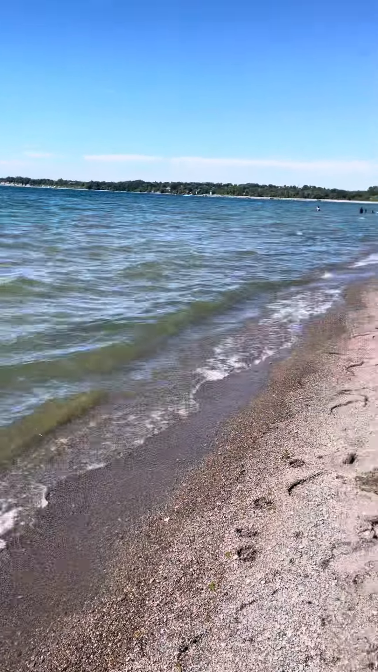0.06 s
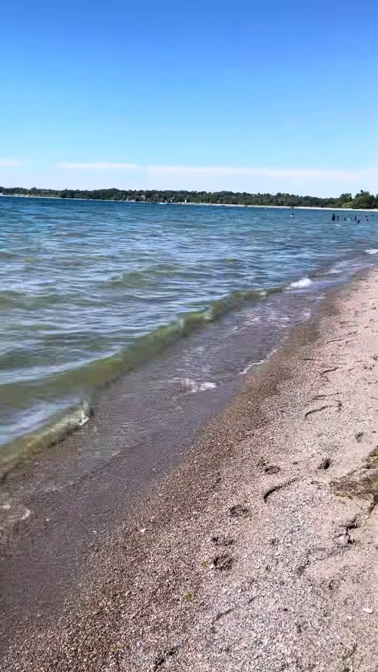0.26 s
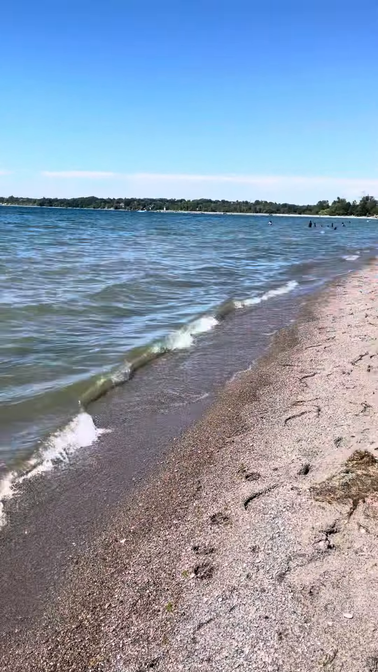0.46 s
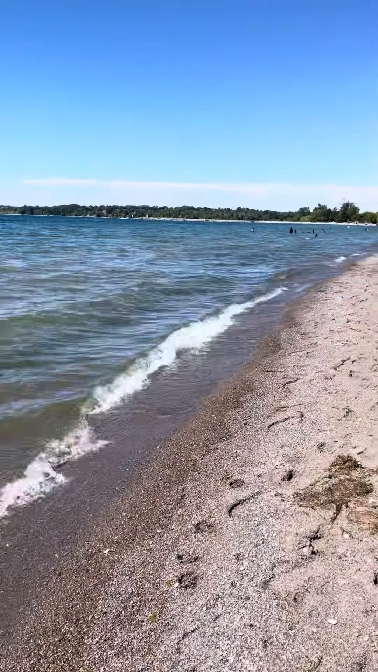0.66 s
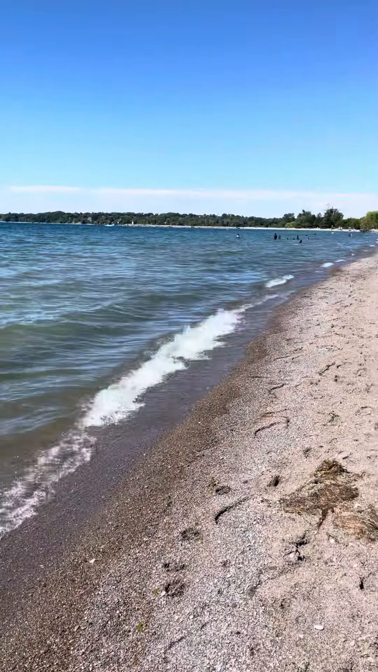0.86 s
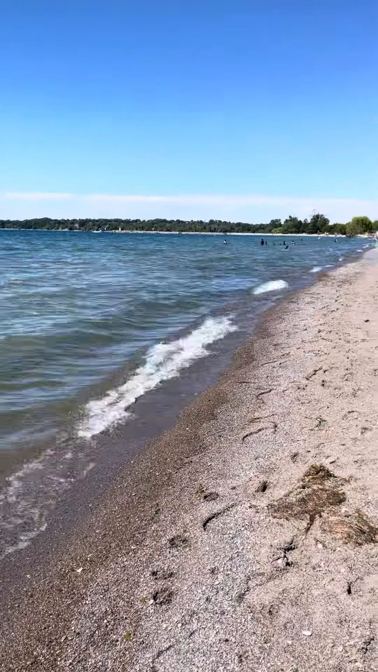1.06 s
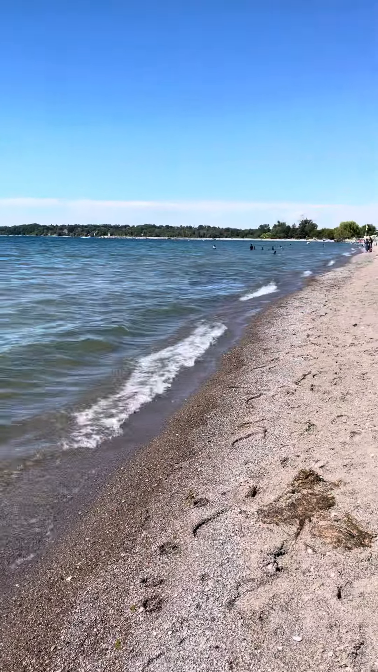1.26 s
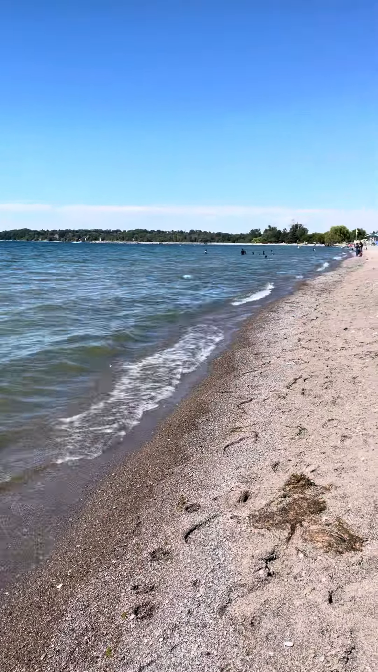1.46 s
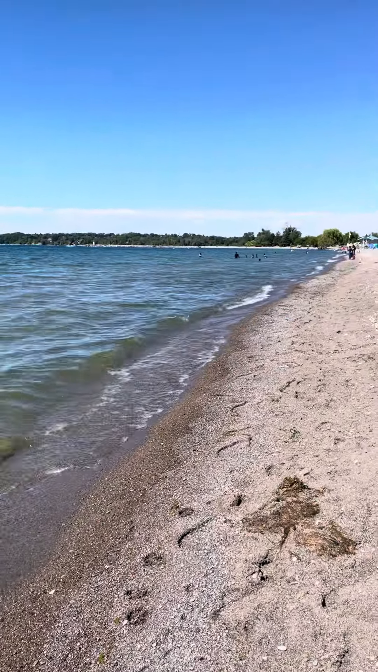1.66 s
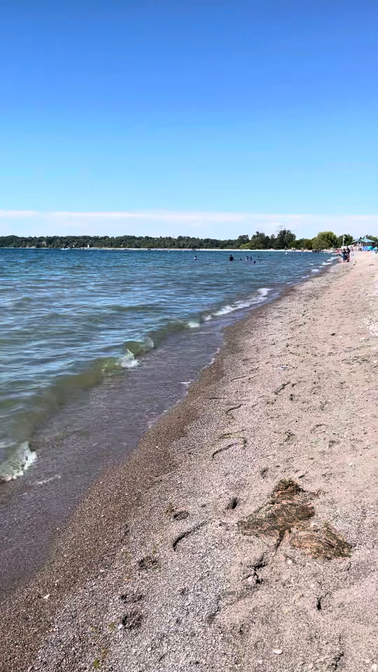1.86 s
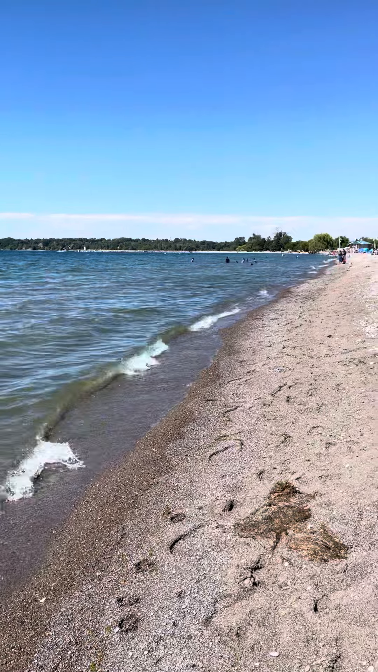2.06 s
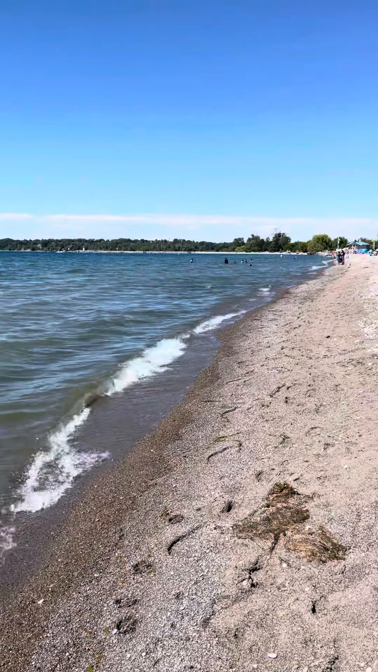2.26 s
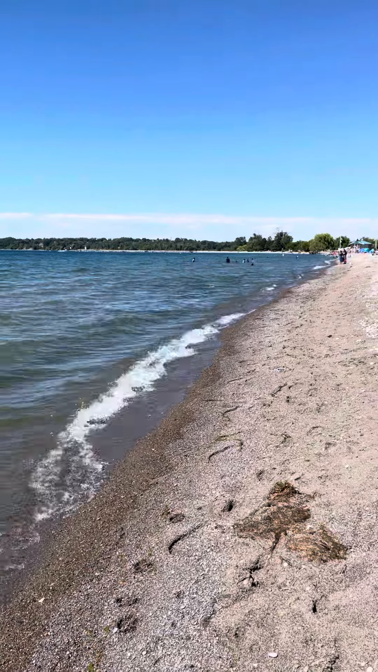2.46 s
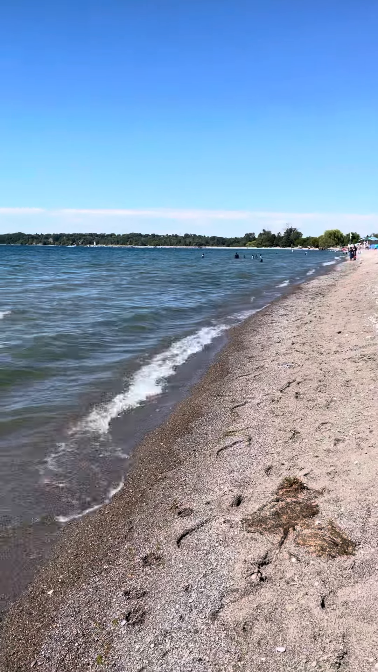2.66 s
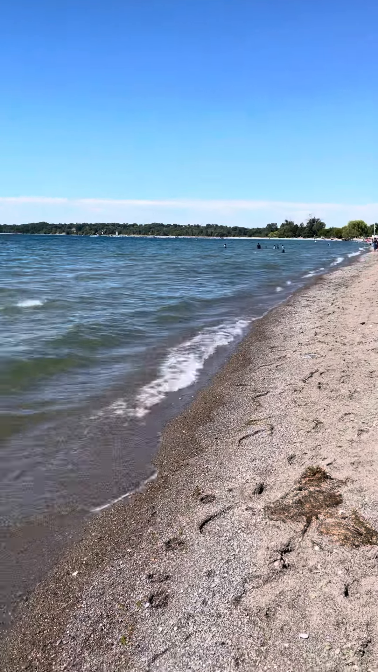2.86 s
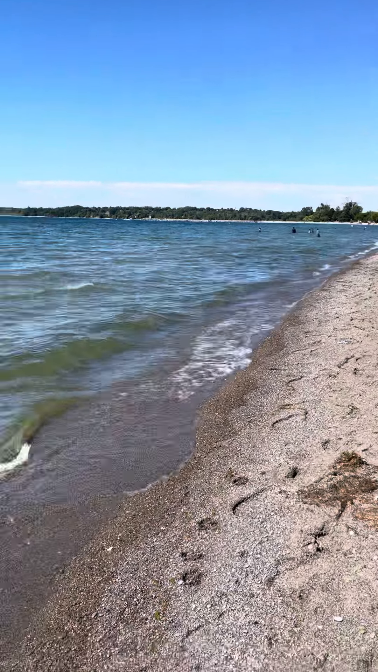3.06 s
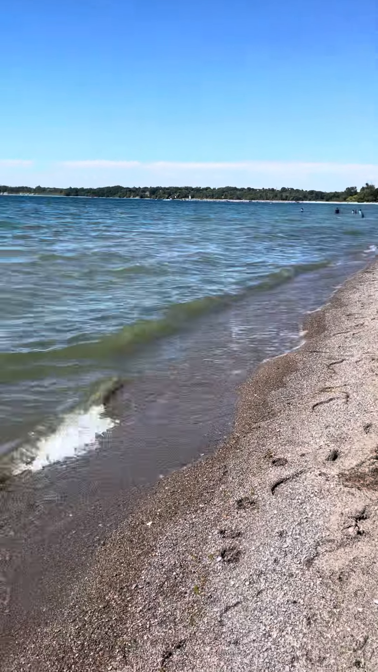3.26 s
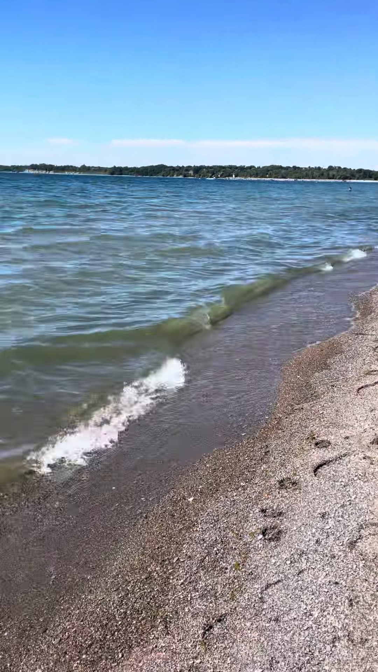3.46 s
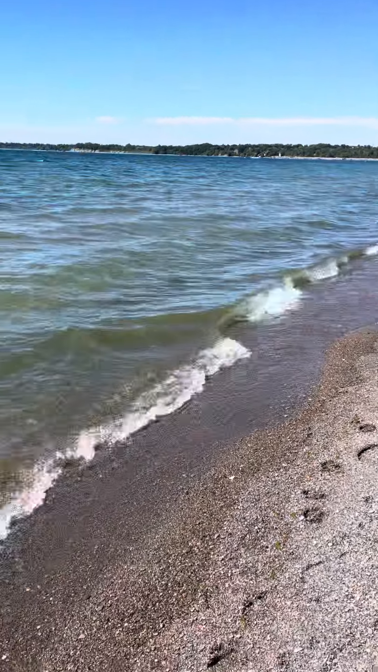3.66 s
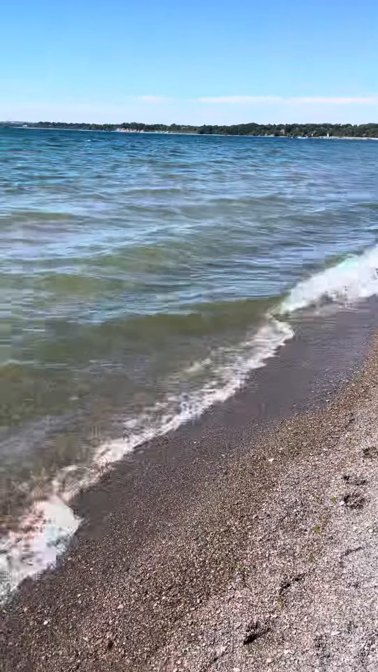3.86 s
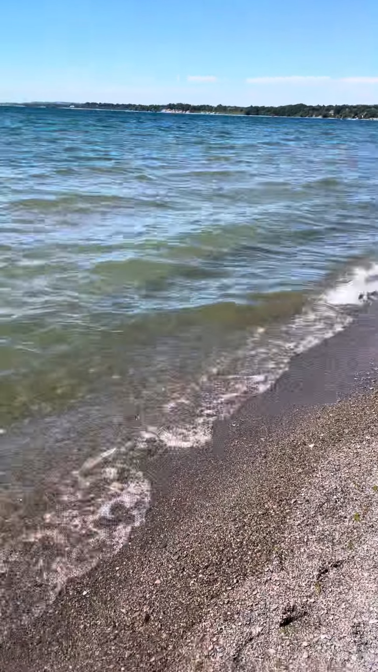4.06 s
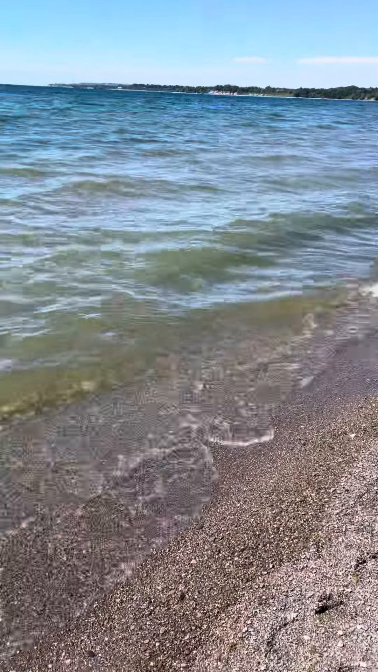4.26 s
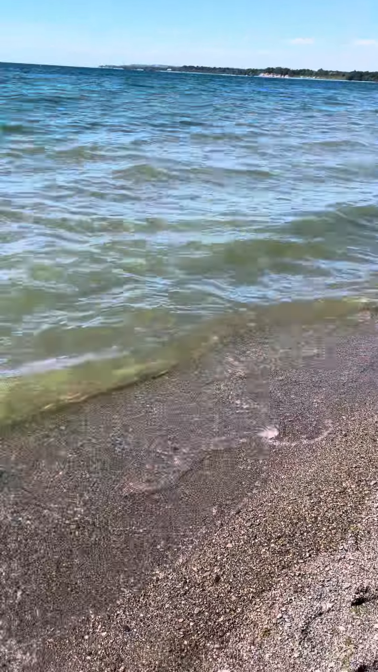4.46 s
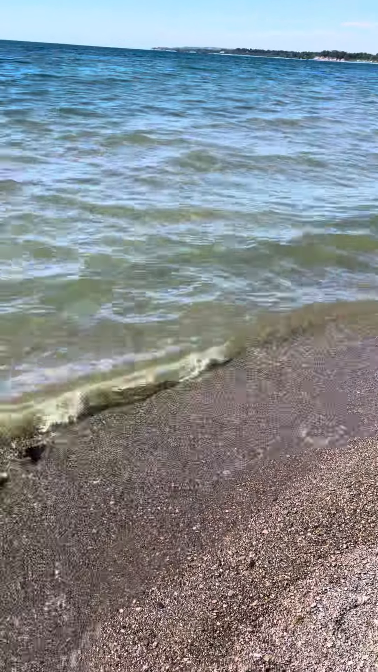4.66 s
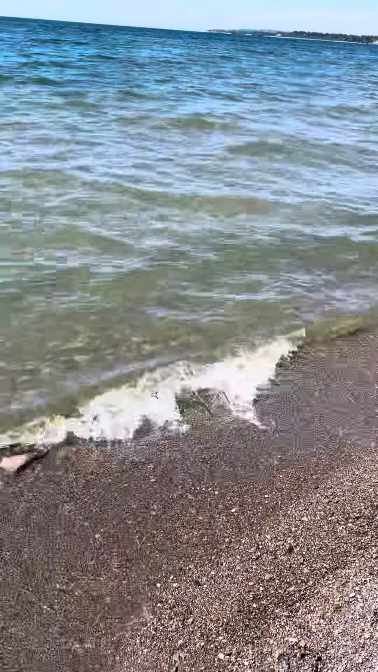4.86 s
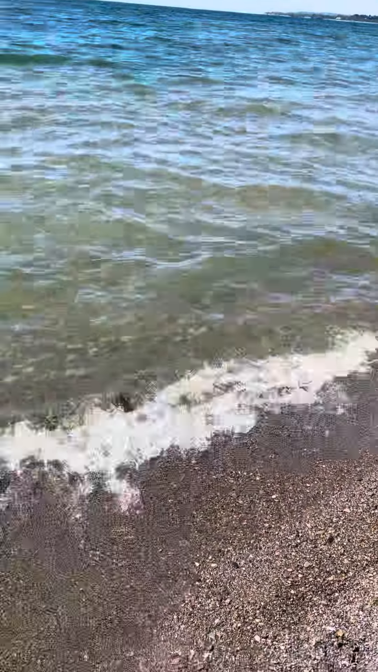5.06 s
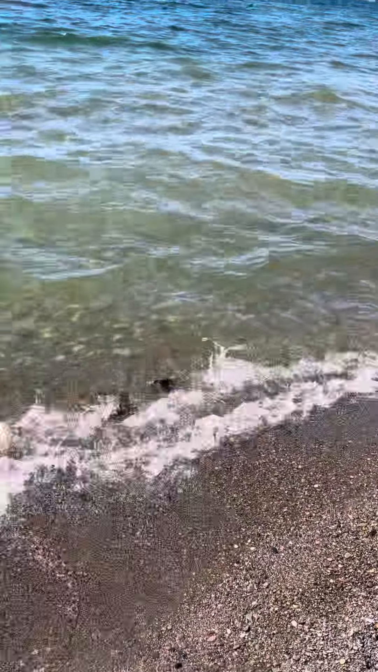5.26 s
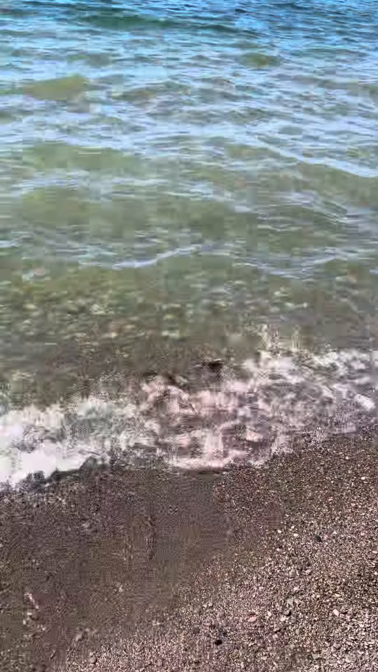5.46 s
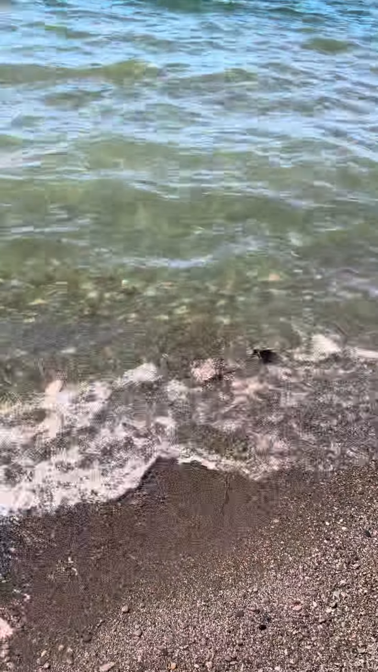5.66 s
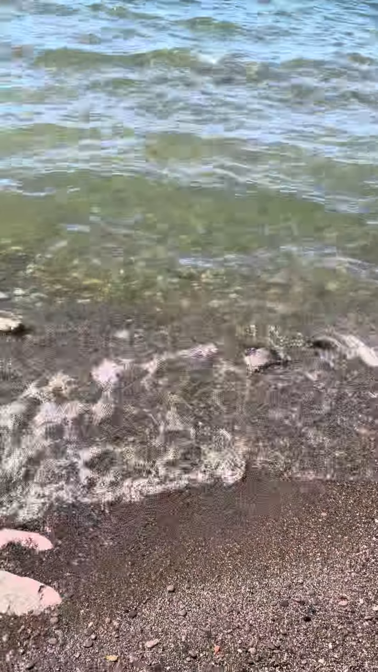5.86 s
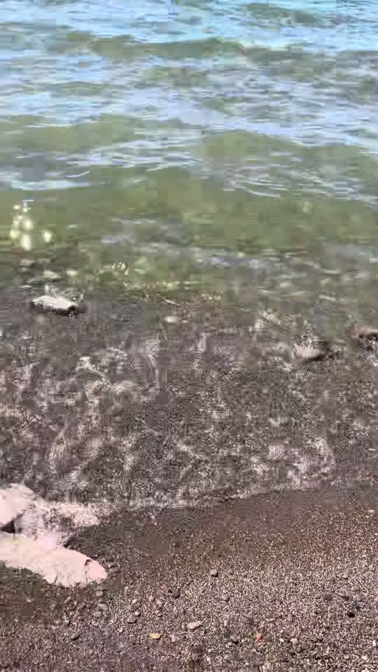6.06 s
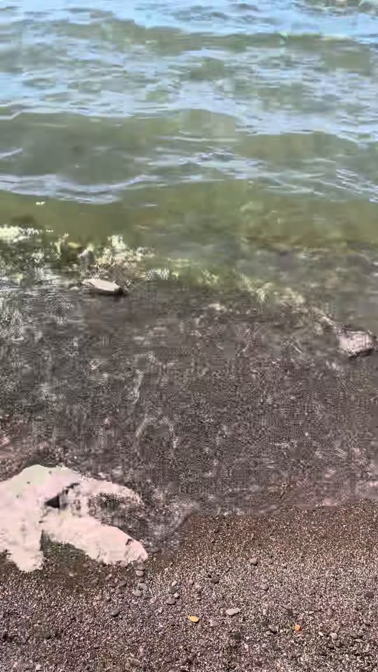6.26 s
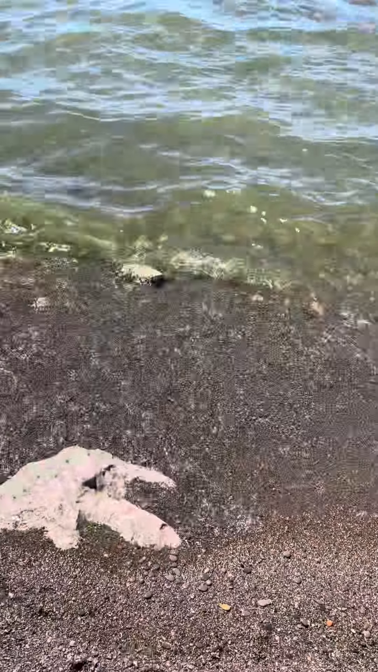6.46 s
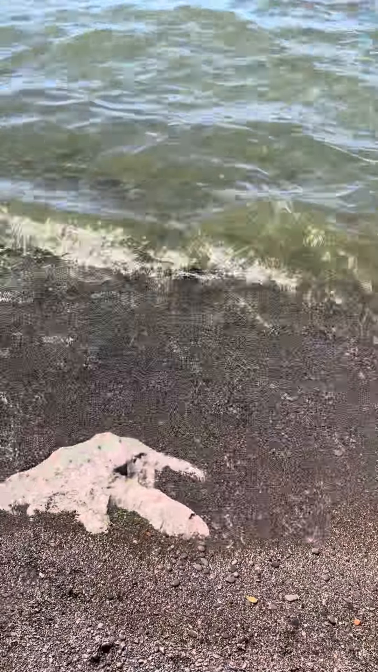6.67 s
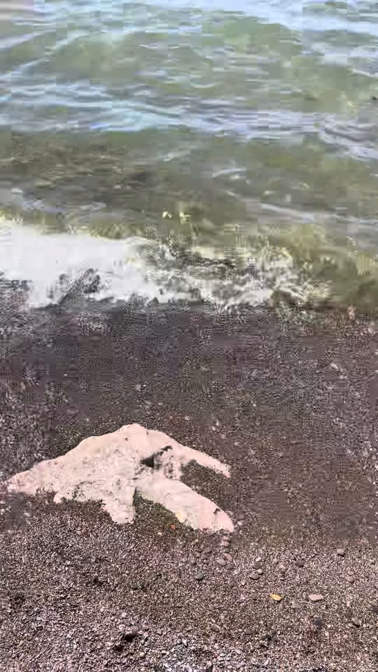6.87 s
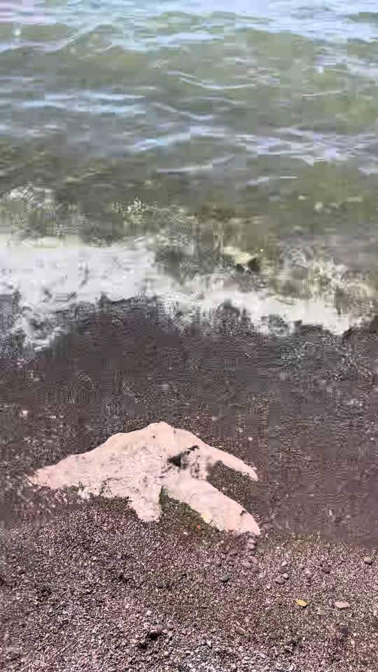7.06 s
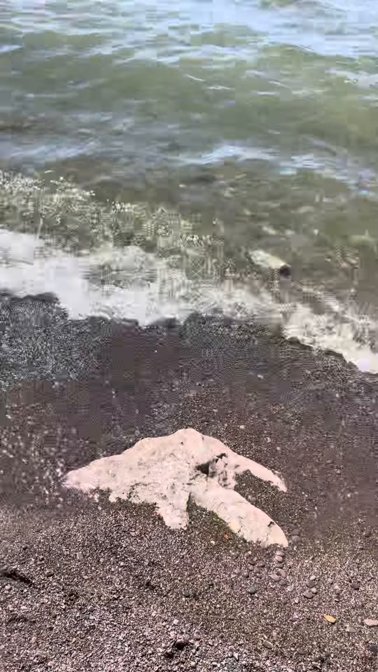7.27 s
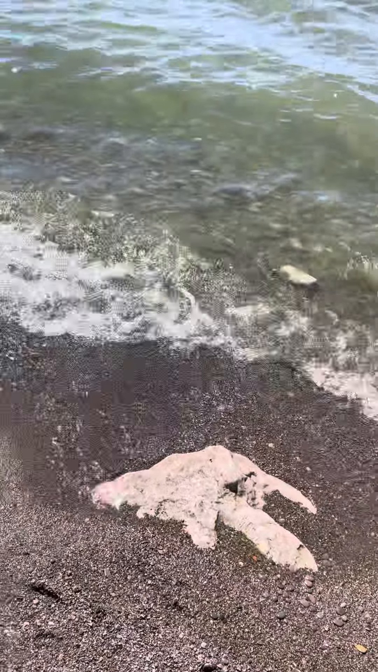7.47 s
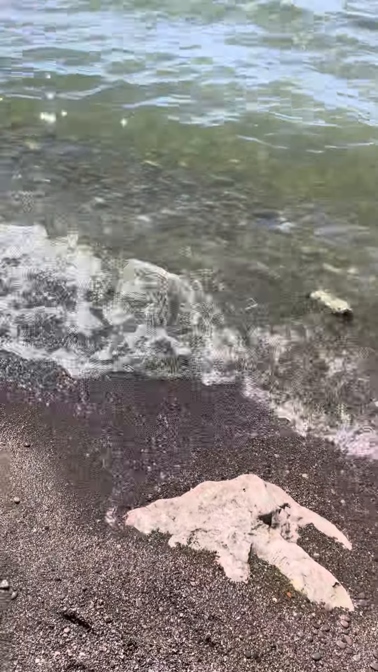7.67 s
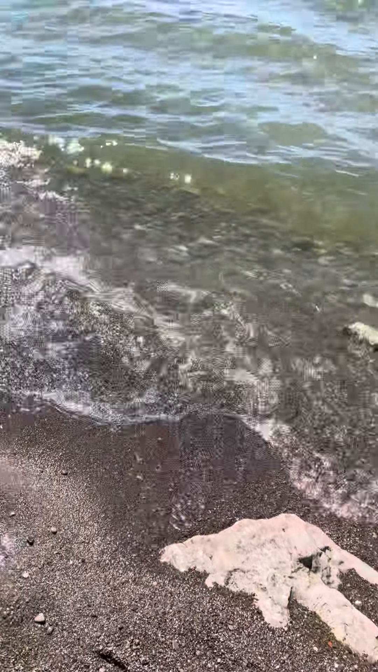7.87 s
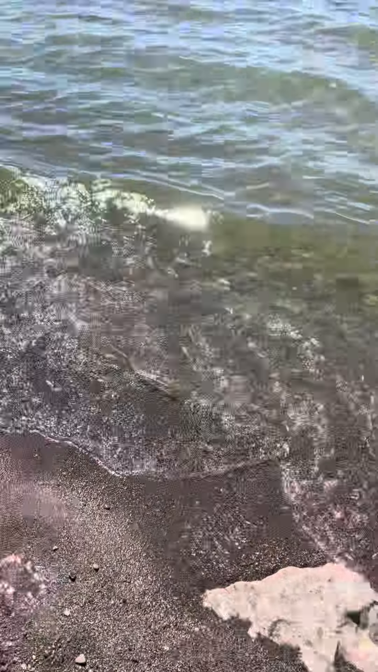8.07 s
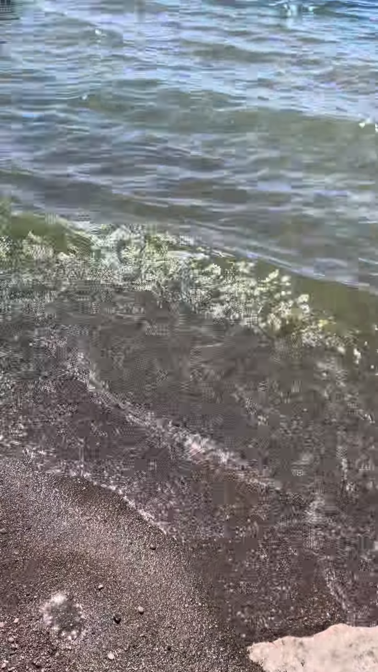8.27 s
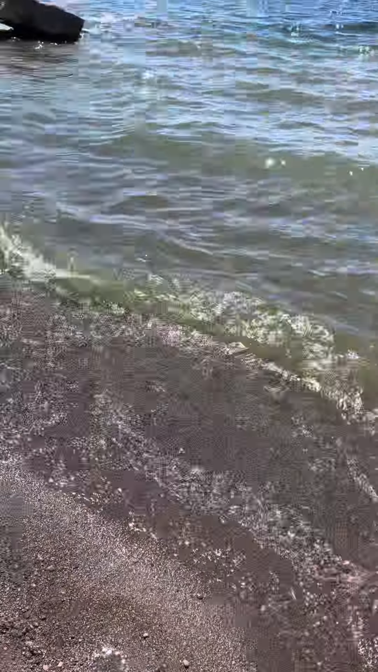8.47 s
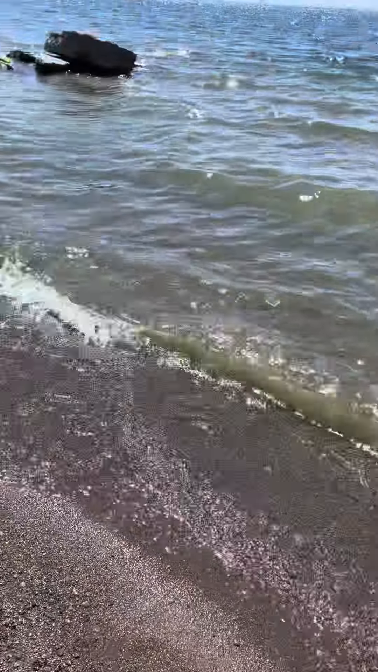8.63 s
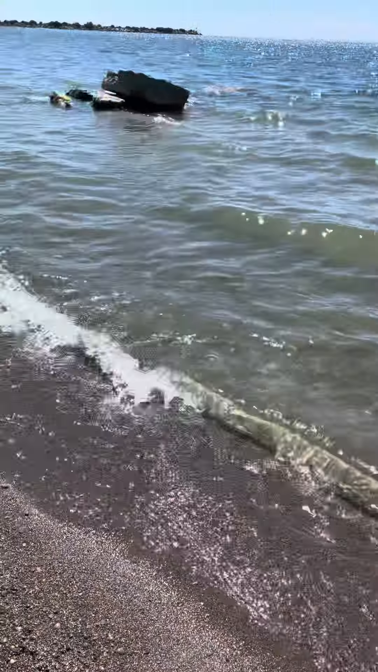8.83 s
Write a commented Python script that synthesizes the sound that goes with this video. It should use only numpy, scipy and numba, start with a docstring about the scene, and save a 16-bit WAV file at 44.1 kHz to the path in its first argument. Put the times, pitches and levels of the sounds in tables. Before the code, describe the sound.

Close lake wavelets slap, spread and drain over sand and pebbles, bubbles plopping and drops ticking, while wind thumps and puffs softly.

```python
"""Small waves break and wash up a sand and pebble lake shore, a step or two from a hand-held phone.
Each breaker is a cloud of short rings and spray noise, its bands following boom, slosh, wash and fizz.
Single large bubbles plop as rings that climb in pitch; drops tick on wet pebbles as bursts of bright noise.
Behind the water, wind noise rumbles on both microphone ports together, with buffets that thump,
and small eddies, dull puffs over a soft roar, push the two ports in opposite ways."""
import sys
import numpy as np
from scipy import signal
from scipy.fft import rfft, irfft, next_fast_len
from scipy.io import wavfile
from scipy.ndimage import uniform_filter1d
from numba import njit

SR = 44100
rng = np.random.default_rng(int(sys.argv[2]) if len(sys.argv) > 2 else 0)


def master(y):
    """Save y as 16-bit WAV."""
    cut = np.clip(np.atleast_2d(y).T, -1, 1)
    pcm = np.round(cut * 32767)  # scale
    wavfile.write(sys.argv[1], SR, pcm.astype(np.int16))


N = 392490  # length [samples]
PORTS = np.array([[1], [-1]])  # left and right microphone port

# where each control of the water rules alone: boom, deep slosh, high slosh, wash, upper wash,
# patter, spray, fizz: (frequency [Hz])
CONTROL_HZ = [160, 270, 430, 850, 1800, 2800, 5500, 11000]


def water():
    """Rings over spray noise in overlapping half-octave bands; each follows the nearest controls and flickers."""
    # colour of the water before it is levelled: (frequency [Hz], relative level [dB per Hz])
    water_colour = [(130, -8), (250, -9), (500, -11), (850, -13.5), (1400, -16), (2600, -19), (2900, -22),
                    (4300, -26), (5200, -25), (6500, -28.5), (8500, -37.5), (11000, -33.5), (13000, -40),
                    (15500, -35)]
    # surf from the sides over the water in front: (frequency [Hz], relative level [dB])
    side_colour = [(150, -30), (600, -14), (1350, -10.5), (1900, -18), (2500, -3.5), (3200, -3.5),
                   (4200, -3), (5300, -10), (6500, -5), (9200, 4), (10200, -32), (12000, -35), (12800, -12)]
    # usual level of each control over the wash, already held in the colour: (level [dB])
    usual_db = [-5, -1, 0, 0, -1.5, -5, -18.5, -19]

    wash_db, over_db = surf()
    controls = over_db - usual_db

    bubbles = unit(grains(9000, 101.4, 17020.0, cycles=25.8, rise=0.13, scatter_db=2.5))
    near = 0.68 * bubbles + 0.62 * rng.standard_normal(N)
    gurgles = unit(grains(260, 278.0, 2998.0, cycles=42.4, rise=0.2, scatter_db=2.0))
    near = near + 0.19 * gurgles

    size = next_fast_len(N)
    hz = np.arange(size // 2 + 1) * SR / size
    colour = undb(at_hz(water_colour, hz)) * np.minimum(hz / 110, 1) ** 4
    # the water in front and, unrelated to it, the surf further along the shore on both sides
    tones = rfft([near, rng.standard_normal(N)], size)
    tones = tones * colour * [np.ones_like(hz), undb(at_hz(side_colour, hz))]
    # level both by the front water's middle, where the wash is heard
    middle = tones[0, (hz > 700) & (hz < 2500)]
    tones /= np.sqrt(2 * np.sum(np.abs(middle) ** 2)) / np.sqrt(size * N)

    out, splash, lap, clump = 0, walk(40), walk(20), walk(36)
    lowest_hz = 88  # centre of the lowest band
    octave = np.log2(np.maximum(hz, 1) / lowest_hz)
    for step in np.arange(16) / 2:  # octaves above the lowest band
        centre = np.log(lowest_hz * 2 ** step)
        share = [np.interp(centre, np.log(CONTROL_HZ), alone) for alone in np.eye(len(CONTROL_HZ))]
        db = wash_db + controls @ share
        # big bubbles and flying spray come in bursts, the middle of the wash is dense and even
        db = db + (0.14 + 0.039 * step) * splash
        db = db + (0.11 + 0.38 * abs(step - 4.6)) * walk(33)
        # neighbouring bands lap together in clumps, each handing part of its swing to the next
        clump = 0.64 * clump + 0.49 * walk(36)
        db = db + 0.69 * clump + 1.3 * max(3.2 - step, 0) / 3.0 * lap
        band = np.maximum(1 - 2 * np.abs(octave - step), 0)
        out = out + undb(db) * irfft(tones * band, size)[:, :N]
    return out


def surf():
    """Level of the wash, and of the eight controls over it; bits of crest that slap down lift them briefly."""
    # breakers; the last three columns count from the wash: (time [s], wash [dB],
    # boom of the falling crest [dB], slosh of big air pockets [dB], hiss of foam [dB])
    breakers = [(0.0, -35.5, 6, 8, 1.5), (.15, -37.5, 6, 4, -4), (.52, -35.5, -8, -8.5, -7.5),
                (1.0, -37, -6, -3.5, -12), (1.15, -42, 0, -1.5, -6.5), (1.36, -45, 4.5, 3.5, -2),
                (1.66, -40.5, -3.5, 3, 0), (2.1, -35.5, -8.5, -4, -6.5), (2.55, -35.5, -3, -3.5, -12),
                (2.97, -47, -6, -5, -3.5), (3.12, -43.5, -8, -8, 1), (3.27, -39, -13, -11.5, 1),
                (3.46, -34.5, -15.5, 1.5, 1), (3.75, -33, -13.5, 0, -7.5), (4.04, -35, -12.5, -5, -9.5),
                (4.21, -40, -18, -19, -9), (4.38, -42, -14, -24, -8), (4.48, -45.5, -6, -26, -3.5),
                (4.58, -47.5, 0, -20, -3.5), (4.72, -38.5, -7, -9.5, -7), (4.87, -35, -7.5, -15.5, -7.5),
                (4.93, -32, 3, 0.5, -8), (5.08, -31, -5, 2, -7), (5.28, -31.5, 0.5, 3, -7.5),
                (5.5, -32.5, 1.5, 3, -8.5), (5.92, -35.5, -9, -3.5, -14), (6.08, -45.5, -4, 1.5, -8.5),
                (6.24, -51, 1, 3.5, -3), (6.4, -43.5, -2, -1.5, -4), (6.6, -38, -1.5, 3, -1.5),
                (6.74, -30, -4, -4, -7.5), (6.92, -30, 0.5, 2.5, -7.5), (7.12, -31, -6, 0, -4.5),
                (7.4, -34.5, -5, 0.5, -5.5), (7.52, -36, -12, -8, -6), (7.7, -39.5, -13, -7.5, -6),
                (7.9, -41.5, -23, -5, -8.5), (8.15, -43, -3, -3, -8), (8.44, -44, -13, -8, -9.5),
                (8.53, -42.5, -17, -6, -2.5), (8.6, -35.5, -12, -14, -6.5), (8.75, -33.5, -6, -9, -7),
                (8.9, -32, -2, -2, -4)]
    # bits of crest that slap down: (time [s], lift of the wash [dB],
    # lift of boom and slosh [dB], half length [s])
    slaps = [(0.062, 4.5, 0, 0.1), (0.634, 7.5, 11, 0.16), (0.898, 7, 12, 0.12), (1.95, 6.5, 3, 0.13),
             (2.251, 8.5, 6.5, 0.083), (2.422, 2, 3, 0.021), (2.494, 1.5, 3.5, 0.054),
             (3.755, 6.5, 3, 0.053), (4.112, 11, 9, 0.11), (4.788, 2, 3, 0.067), (4.841, 3.5, 8, 0.016),
             (5.048, 4.5, 3, 0.036), (5.3, 4.5, -3.5, 0.076), (5.57, 6, 2.5, 0.07), (6.17, 7.5, 5.5, 0.091),
             (6.423, 0.5, -2, 0.037), (6.687, 2.5, -2, 0.045), (6.867, 2.5, 2, 0.049),
             (8.59, 4.5, 4, 0.044)]
    # deep part of the slosh over its high part: (time [s], level [dB])
    depth = [(0.0, -4), (.3, 5), (.6, -3), (1.5, 2), (2.1, -3), (2.55, 1), (2.85, -1.5), (3.3, -11),
             (3.6, -2), (4.05, 6), (4.35, -19), (4.55, 0), (4.72, 16), (4.95, 7.5), (5.4, -1), (6.3, -0.5),
             (6.6, 4), (7.2, 2), (7.65, -3.5), (8.25, -2.5), (8.58, 0), (8.72, 11), (8.9, 5)]
    # spray and fizz over the hiss: (time [s], level [dB])
    fizz = [(0.0, -16), (.9, -10.5), (1.5, -17), (2.4, -12.5), (3.4, -15.5), (4.2, -12), (4.9, -8.5),
            (5.8, -9.5), (6.2, -11.5), (6.8, -10), (7.6, -14.5), (8.3, -10.5), (8.55, -11.5), (8.9, -8.5)]
    # part of the upper wash's level that the slaps and the hiss do not give: (time [s], level [dB])
    brightness = [(0.0, -3.5), (.9, 0.5), (1.6, -3.5), (2.5, 1.5), (3.1, -1.5), (3.6, -2), (4.9, 3.5),
                  (5.5, 0), (6.1, 1.5), (6.7, 2), (7.8, 2), (8.3, 1.5), (8.9, 1)]

    wash_db, boom_db, slosh_db, hiss_db = curves(breakers)
    t = np.arange(N) / SR
    wash_lift, low_lift = np.zeros((2, N))
    for s, lift_db, low_db, half in slaps:
        shape = np.maximum(1 - np.abs(t - s) / half, 0)
        wash_lift = wash_lift + lift_db * shape
        low_lift = low_lift + low_db * shape

    hiss_db = hiss_db + 0.56 * wash_lift  # share of a slap that reaches the treble
    patter_db = 0.76 * hiss_db  # share of the hiss's moves that the low treble follows
    slosh_db = slosh_db + low_lift
    half_depth = curves(depth)[0] / 2
    spray_db = hiss_db + curves(fizz)[0]
    upper_db = (wash_lift + patter_db) / 2 + curves(brightness)[0]
    over_db = [boom_db + low_lift, slosh_db + half_depth, slosh_db - half_depth, wash_lift,
               upper_db, patter_db, spray_db, spray_db]
    return wash_db, np.array(over_db).T


def plops():
    """Each big bubble swells, rings at its own pitch and climbs as it nears the surface."""
    # single large bubbles: (time [s], nominal level [dB], starting pitch [Hz], nominal ring [s to -60 dB])
    bubbles = [(.322, -20.5, 1550, 0.016), (.62, -22.5, 744, .04), (0.786, -17.5, 143, 0.037),
               (.872, -18, 196, .06), (1.526, -31.5, 1990, 0.022), (2.001, -24, 740, 0.053),
               (2.221, -29, 1810, 0.032), (2.235, -20, 770, .04), (2.479, -17.5, 199, 0.057),
               (2.487, -17, 268, 0.074), (2.802, -32.5, 540, 0.045), (2.839, -32, 640, .03),
               (3.029, -32, 180, .07), (3.033, -30.5, 650, 0.039), (3.128, -36, 550, .036),
               (3.259, -29, 1130, .033), (3.302, -24, 1470, .022), (3.414, -29, 424, 0.082),
               (3.47, -20, 480, 0.034), (3.74, -20.5, 308, 0.054), (3.767, -18.5, 690, 0.034),
               (4.028, -28.5, 191, 0.088), (4.072, -25, 780, 0.023), (4.076, -28, 271, 0.075),
               (4.116, -21, 950, 0.016), (4.138, -23, 1570, 0.012), (4.367, -35, 1070, .025),
               (4.479, -32.5, 2730, .02), (4.617, -33, 1130, .025), (4.667, -33.5, 230, .07),
               (4.712, -32, 690, 0.04), (4.784, -25.5, 1270, .033), (4.835, -25.5, 646, 0.048),
               (4.836, -21.5, 1990, 0.017), (4.914, -16, 207, 0.05), (4.995, -15.5, 230, .06),
               (5.012, -18, 149, 0.076), (5.211, -17, 260, 0.061), (5.355, -21, 280, 0.071),
               (5.487, -26, 440, .05), (5.648, -21, 1200, 0.018), (5.671, -34, 506, .04),
               (5.897, -28, 590, .045), (6.175, -34, 930, .035), (6.246, -39, 1360, 0.067),
               (6.39, -27.5, 740, 0.049), (6.402, -28, 735, 0.045), (6.408, -28, 760, .05),
               (6.482, -30, 370, 0.044), (6.531, -25, 730, .025), (6.555, -26, 740, 0.027),
               (6.7, -21, 142, 0.1), (7.381, -30, 200, .08), (7.465, -35, 549, 0.032),
               (7.512, -34.5, 220, .07), (7.848, -36.5, 300, 0.066), (8.187, -34, 467, 0.037),
               (8.301, -34.5, 850, .04), (8.32, -34.5, 450, .065), (8.409, -36, 1030, .03),
               (8.464, -39, 222, 0.081), (8.483, -43, 993, .03), (8.504, -37, 452, .04),
               (8.575, -26, 770, .04), (8.58, -27, 1410, .018), (8.643, -30, 1000, .03),
               (8.671, -31, 1380, .02), (8.696, -27, 1370, .018), (8.722, -24.5, 920, .03),
               (8.81, -20, 1360, 0.013), (8.836, -19, 1110, .025), (8.858, -23, 1513, .018)]
    rise, swell = 0.057, 0.38  # pitch climb over the nominal ring; swelling time as a share of it
    s, db, hz, t60 = np.transpose(bubbles)
    size = undb(db) / ((1 - swell) * swell ** (swell / (1 - swell)))
    start = (s * SR).astype(np.int64)

    def part(share):
        """Rings cut to a share of their nominal time, climbing at the same pace."""
        return ring(N, start, hz, share * t60, share * rise, size, float(SR))

    # the fast decay taken from the slower one leaves a ring that swells before it fades
    return part(0.83) - part(swell)


def ticks():
    """A drop smacking a wet pebble is a burst of bright noise that swells and dies in milliseconds."""
    # drops on wet pebbles: (time [s], peak of the envelope [dB])
    drops = [(1.5708, -40), (1.6282, -37), (1.7174, -33), (2.2144, -32), (2.2657, -37), (3.273, -29),
             (3.4575, -33), (4.425, -35), (4.8179, -39), (4.8429, -38), (4.8794, -27), (6.1903, -39),
             (6.5256, -38), (6.5954, -33), (6.6248, -30), (8.5215, -33), (8.5674, -32), (8.6093, -29),
             (8.6214, -33), (8.7194, -27), (8.7324, -32)]
    s, db = np.transpose(drops)
    blows = np.zeros(N)
    blows[(s * SR).astype(int)] = undb(db)
    t = np.arange(SR // 20) / SR / 0.0041  # 1 at the peak, 4.1 ms after the touch
    envelope = signal.fftconvolve(blows, (t * np.exp(1 - t)) ** 3)[:N]
    bright = shaped(rng.standard_normal(N),
                    lambda hz: np.minimum(hz / 5500, 1) ** 3 / (1 + (hz / 11000) ** 2))
    return envelope * bright


def rumble():
    """Wind pressure as low noise, one part common to the ports and a weaker uneven one, with buffets."""
    # rumble between the buffets: (time [s], level [dB])
    wind_level = [(0.0, -25.5), (.3, -25.5), (.59, -29.5), (.66, -37.5), (.9, -33), (1.12, -38),
                  (1.4, -41.5), (2.6, -44.5), (3.77, -53.5), (4.1, -45), (4.4, -48.5), (4.8, -46),
                  (5.2, -49), (5.6, -42), (6.3, -38), (6.7, -39), (7.1, -43), (7.5, -40.5), (7.95, -41),
                  (8.4, -45), (8.66, -31), (8.9, -41)]
    # colour of the rumble before it is levelled: (frequency [Hz], relative level [dB per Hz])
    rumble_colour = [(12, -54), (20, -20), (53, -0.5), (70, 3), (108, -2), (146, -14), (198, -23),
                     (250, -16), (320, -41), (550, -120)]
    # buffets that thump the phone: (time [s], peak of the added level [dB])
    thumps = [(.12, -21), (.225, -20), (.79, -32), (1.29, -38), (1.56, -42), (1.96, -34), (2.5, -27.5),
              (5.33, -28), (5.45, -30), (6.22, -30.5), (6.44, -39), (6.55, -40), (6.67, -33), (6.82, -39),
              (7.19, -35), (7.78, -38), (7.86, -42), (8.45, -43), (8.64, -29), (8.78, -44), (8.88, -29)]
    uneven_db, spread_s = -15, 0.016  # part that differs between the ports; spread of a buffet in time

    noise = unit(shaped(rng.standard_normal((2, N)), lambda hz: undb(at_hz(rumble_colour, hz))))
    noise = noise * undb([[0], [uneven_db]])
    t = np.arange(N) / SR
    buffets = sum(undb(db) * np.exp(-.5 * ((t - s) / spread_s) ** 2) for s, db in thumps)
    return noise * (undb(curves(wind_level)[0] + 1.5 * walk(9.2)) + buffets)


def eddies():
    """Small eddies shed at the ports: short dull puffs over a soft roar."""
    # eddies on the ports: (time [s], level [dB])
    eddy_level = [(0.0, -30), (.22, -45), (.38, -34), (.5, -44), (.9, -46), (1.2, -58), (1.9, -58),
                  (2.9, -72), (3.12, -52), (3.38, -30.5), (3.75, -40), (4.0, -32.5), (4.62, -40.5),
                  (5.0, -34.5), (5.55, -41), (6.0, -51), (6.38, -50), (6.5, -39.5), (7.1, -33.5),
                  (7.3, -37), (8.3, -37.5), (8.75, -34.5), (8.9, -24)]
    # colour of the eddies before they are levelled: (frequency [Hz], relative level [dB per Hz])
    eddy_colour = [(40, -17), (150, -1.5), (300, 2.5), (600, -1.5), (900, -8.5), (1300, -15), (1800, -29)]
    puffs = unit(grains(400, 59.0, 1480.0, cycles=8.5, rise=0., scatter_db=2.2))
    puffs = puffs + 0.99 * rng.standard_normal(N)
    dull = unit(shaped(puffs, lambda hz: undb(at_hz(eddy_colour, hz))))
    return dull * undb(curves(eddy_level)[0] + 1.3 * walk(12))


def phone_body(front):
    """The body between the ports sets their phase and level apart, by amounts that change with frequency."""
    # phase by which the left port leads: (frequency [Hz], lead [rad])
    lead = [(0, 0.6), (250, 0.32), (700, 0.56), (2000, 0.32), (2800, 0.64), (4000, .5), (5300, 0.13),
            (6200, 1.2), (7000, 3), (8300, 3.5), (9300, 6), (10200, 6.5), (12000, 7.5), (12750, 7),
            (13400, 9.5), (15000, 9.5), (15700, 10.5)]
    # left port over the right: (frequency [Hz], level [dB])
    shadow = [(60, 1), (300, 2), (700, 6), (1300, 3.5), (2400, 1.5), (4400, .5), (6500, 0)]
    # each port takes half of the difference
    return shaped(front, lambda hz: np.exp(.5j * PORTS * at_hz(lead, hz)) * undb(PORTS * at_hz(shadow, hz) / 2))


def undb(db):
    """Decibels to an amplitude factor."""
    return 10 ** (np.asarray(db) / 20)


def unit(x):
    """Scale to an RMS of 1."""
    return x / np.sqrt(np.mean(x ** 2))


def curves(table):
    """Columns of a table as values for every sample."""
    s, *columns = np.transpose(table)
    return [np.interp(np.arange(N) / SR, s, c) for c in columns]


def at_hz(table, hz):
    """Read (frequency [Hz], value) points on a log frequency axis."""
    points = np.transpose(table)
    return np.interp(np.log(hz + 1), np.log(points[0] + 1), points[1])


def shaped(x, gain):
    """Filter by a gain that is a function of frequency."""
    size = next_fast_len(N)
    hz = np.arange(size // 2 + 1) * SR / size
    return irfft(rfft(x, size) * gain(hz), size)[..., :N]


def walk(rate):
    """Random levels held 1 / rate s and slewed twice, their slow drift taken out; RMS 1."""
    k = int(SR / rate)
    held = np.repeat(rng.standard_normal(N // k + 1), k)
    steps = uniform_filter1d(uniform_filter1d(held, k), k)[:N]
    return unit(steps - uniform_filter1d(steps, 2 * k))


@njit
def ring(length, start, hz, t60, rise, size, rate):
    """Damped sines whose pitch climbs by the factor 1 + rise over their life."""
    out = np.zeros(length)
    for k in range(len(start)):
        life = int(t60[k] * rate) + 2
        z = size[k] + 0j
        p = np.exp(2j * np.pi * hz[k] / rate - np.log(1000) / life)  # one sample of turn and decay
        turn = np.exp(2j * np.pi * hz[k] * rise / rate / life)
        for i in range(start[k], min(start[k] + life, length)):
            out[i] += z.imag
            z *= p
            p *= turn
    return out


def grains(per_s, lo_hz, hi_hz, cycles, rise, scatter_db):
    """A random shower of short rings, spread evenly in pitch and flat in colour, some louder than the rest."""
    when, pitch, luck = rng.random((int(per_s * N / SR), 3)).T
    hz = lo_hz + (hi_hz - lo_hz) * pitch
    # higher rings are shorter, so they start louder
    size = undb(scatter_db * np.minimum(-np.log(1 - luck), 3.6)) * np.sqrt(hz)
    return ring(N, (when * N).astype(np.int64), hz, cycles / hz, rise, size, float(SR))


def scene():
    """Water and common wind reach both ports alike; side surf and eddies push them in opposite ways."""
    # water from the sides swells and sinks as the phone turns along the shore: (time [s], level [dB])
    side_level = [(0.0, 4), (.6, -1), (1.3, 1.5), (2.4, 0), (3.1, 3.5), (3.7, 1.5), (4.1, -3), (4.8, 0),
                  (5.5, 5), (6.1, 3), (6.4, -3), (7.2, -5.5), (7.7, -1), (8.2, 1), (8.9, -2)]
    front, sides = water()
    wind, uneven = rumble()
    heard = phone_body(front + plops() + ticks() + wind)
    return heard + PORTS * (sides * undb(curves(side_level)[0]) + eddies() + uneven)


def record(dry):
    """The phone cuts the top steeply above 15830 Hz."""
    top_cut = signal.ellip(14, .3, 80, 15830, fs=SR, output="sos")  # order, ripple and stop band [dB], edge [Hz]
    return signal.sosfilt(top_cut, dry)


dry = scene()
out = record(dry)
master(out)
```